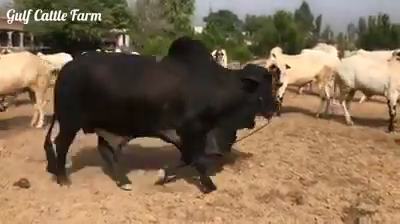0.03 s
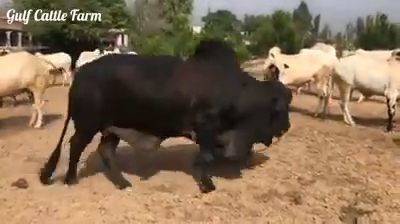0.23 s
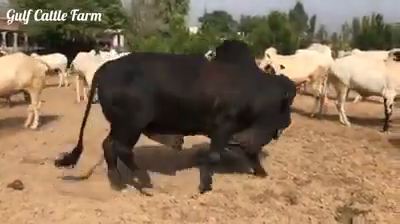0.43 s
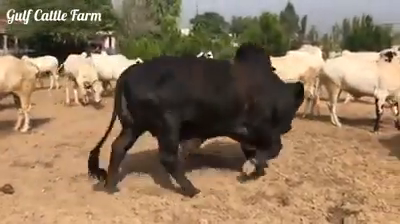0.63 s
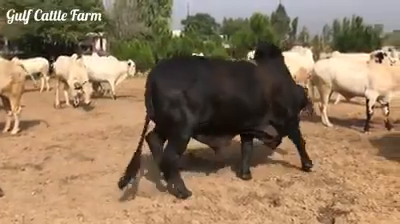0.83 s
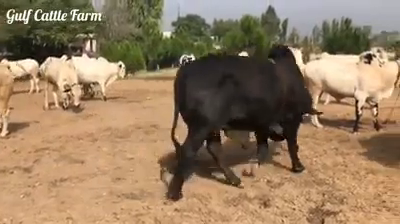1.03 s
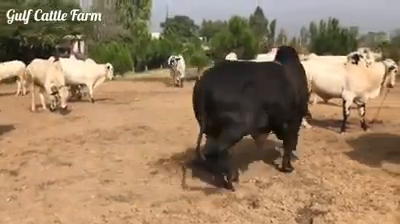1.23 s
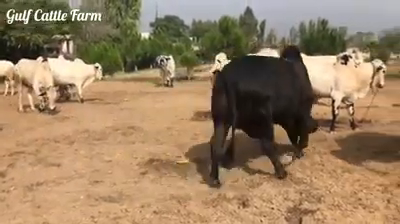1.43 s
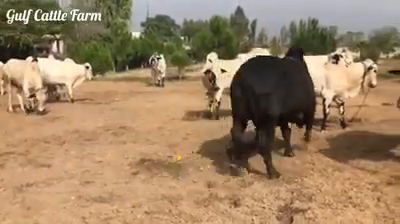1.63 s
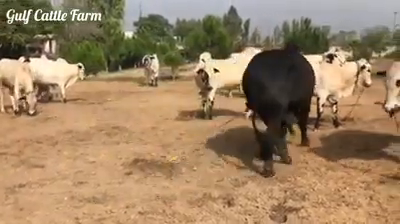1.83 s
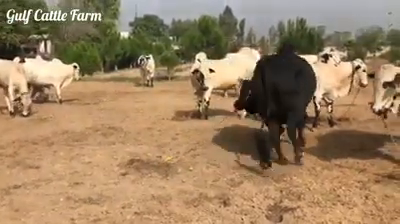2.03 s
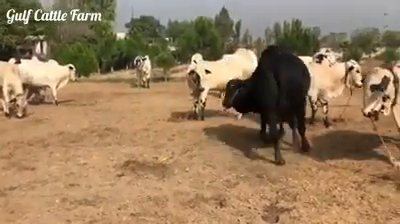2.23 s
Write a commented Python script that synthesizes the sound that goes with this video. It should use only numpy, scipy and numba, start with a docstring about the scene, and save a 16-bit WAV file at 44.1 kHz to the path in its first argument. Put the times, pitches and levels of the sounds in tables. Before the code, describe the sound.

A deep, raspy grunt from a nearby bull slows to a creak and finishes with a puff through the nostrils. Quiet gritty steps and a hoof knock follow, over faint outdoor rumble and a far idling engine.

```python
"""A farmyard of dry earth. A big bull gives one low, hoarse grunt: pulses from his vocal folds excite
the resonances of throat, chest and mouth, then slow into a creak. A snort of turbulent air through
the nostrils ends it. He walks off: hooves scuff, grit ticks and one hoof knocks twice. A far engine
idles over rumble and open-air hiss, and a small bird whistles faintly."""
import sys
import numpy as np
from scipy import signal
from scipy.fft import rfft, irfft
from scipy.io import wavfile
from scipy.ndimage import uniform_filter1d
from numba import njit

SR = 44100
rng = np.random.default_rng(int(sys.argv[2]) if len(sys.argv) > 2 else 0)


def put_to_file(sound):
    """Save the sound as 16-bit audio at rate SR, in the file named by the first command-line argument."""
    columns = np.atleast_2d(sound).T  # one column per channel
    safe = np.clip(columns, -1, 1)
    whole_steps = np.round(safe * 32767)
    wavfile.write(sys.argv[1], SR, whole_steps.astype(np.int16))


N = 105840
TIME_S, FREQ_HZ = np.arange(N) / SR, np.fft.rfftfreq(N, 1 / SR)


def undb(db):
    """Decibels to amplitude ratio."""
    return 10 ** (np.asarray(db) / 20)


def unit(x):
    """Normalisation to rms 1."""
    return x / np.sqrt(np.mean(x ** 2) + 1e-20)


def curve(rows, column=1):
    """Linear interpolation of a table column in time; the end values hold."""
    rows = np.array(rows)
    return np.interp(TIME_S, rows[:, 0], rows[:, column])


def drift(rate_hz):
    """Smoothed random steps, rms 1."""
    hold = max(int(SR / rate_hz), 1)
    steps = rng.standard_normal(N)[np.arange(N) // hold]
    return unit(uniform_filter1d(uniform_filter1d(steps, hold), hold))


def colour(x, points):
    """Minimum-phase filter through (frequency_hz, gain_db) points, by folding the cepstrum."""
    hz, db = np.array(points).T
    gain = undb(np.interp(np.log(np.maximum(FREQ_HZ, 1)), np.log(hz), db))
    cepstrum = irfft(np.log(gain), N)
    cepstrum[1:N // 2] *= 2
    cepstrum[N // 2 + 1:] = 0
    return irfft(rfft(x) * np.exp(rfft(cepstrum)), N)


@njit
def state_variable_filter(x, hz, width_hz):
    """Two integrators in a loop: a damped oscillator with a moving centre frequency."""
    y, band, low = np.empty(len(x)), 0., 0.
    for i in range(len(x)):
        g, damping = np.tan(np.pi * hz[i] / SR), width_hz / hz[i]
        v = (band + g * (x[i] + 1e-18 - low)) / (1 + g * (g + damping))
        band, low, y[i] = 2 * v - band, low + 2 * g * v, damping * v
    return y


def resonate(x, hz, width_hz):
    """Two equal resonators in cascade, each width_hz wide, with gain 1 at the centre."""
    for _ in range(2):
        x = state_variable_filter(x, hz * np.ones(N), float(width_hz))
    return x


def steep(x, hz, kind):
    """Sixth-order Butterworth high-pass or low-pass."""
    return signal.sosfilt(signal.butter(6, hz, kind, fs=SR, output="sos"), x)


# Partials of the idling engine: frequency_hz, level_db
ENGINE_PARTIALS = [(68.5, -51.5), (101.5, -53), (147, -63), (203, -63), (302, -71.5), (404, -69.5)]
# Swell of the whole drone: time_s, gain_db
ENGINE_SWELL = [(0, -3.5), (.9, -4), (1.5, 2.5), (2, -5), (2.4, -8)]
def engine(wander=0.00809, throb_db=1.5):
    """Rotating machinery: all partials follow one wandering speed, and each throbs on its own."""
    phase_per_hz = 2 * np.pi * np.cumsum(1 + wander * drift(5.92)) / SR
    drone = 0
    for hz, db in ENGINE_PARTIALS:
        amplitude = np.sqrt(2) * undb(db + throb_db * drift(14))
        drone += amplitude * np.sin(hz * phase_per_hz + 2 * np.pi * rng.random())
    return drone * undb(curve(ENGINE_SWELL))


# Spectrum of far rumble and hiss: frequency_hz, relative_db
AMBIENT_SPECTRUM = [(15, -31), (25, 0.5), (81, -3), (213, -14.5), (250, -31.5), (318, -13), (462, -28.5),
                    (673, -28.5), (2020, -27), (2240, -26.5), (3830, -29), (5010, -38.5), (13800, -41.5),
                    (15000, -37)]
def open_air(level_db=-51.5):
    """Ambient noise: a continuous spectrum, strongest in the bass, whose level wavers slowly."""
    return unit(colour(rng.standard_normal(N), AMBIENT_SPECTRUM)) * undb(level_db + 1.15 * drift(3))


# Vibration of the vocal folds: time_s, pitch_hz
FOLD_PITCH = [(.17, 101.2), (.24, 99.8), (.305, 101.3), (.365, 88.25), (.44, 86.5), (.5, 71.67),
              (.55, 59.3), (.6, 54.07)]
# Effort of the voice: time_s, boom_gain_db, odd_over_even_pulse_db
VOICE_EFFORT = [(0, -57, 4), (.11, -86.5, 7), (.155, -40, 1), (.2, -43, -4.5), (.22, -24.5, -2.5),
                (.25, -22, 0.5), (.32, -21, -7.5), (.39, -22, -6.5), (.445, -26, -5), (.47, -33, -6),
                (.5, -30.5, 3.5), (.557, -34.5, -10), (.573, -35, -15.5), (.605, -36, -5), (.66, -88, 2)]
def grunt(jitter=0.01015, shimmer_db=2.5, puff_decay_cycles=0.56):
    """Source and filter: alternating strong and weak glottal pulses drive the throat and mouth."""
    hz = curve(FOLD_PITCH) * (1 + jitter * drift(90))
    cycles = np.cumsum(hz) / SR
    pulse_index = cycles.astype(int)
    alternation_db = curve(VOICE_EFFORT, column=2) * (pulse_index % 2 - .5)
    strength = undb(shimmer_db * rng.standard_normal(N)[pulse_index] + alternation_db)
    pulses = unit(np.diff(pulse_index, prepend=0) * strength / np.sqrt(hz))
    # A turbulent puff follows each pulse.
    puffs = unit(np.exp(-(cycles % 1) / puff_decay_cycles) * rng.standard_normal(N))
    boom = throat_boom(pulses + 0.33 * puffs, cycles)
    return boom * undb(curve(VOICE_EFFORT)) + mouth_rasp(pulses + puffs)


# Response of the throat: frequency_hz, relative_db
THROAT_RESPONSE = [(30, -31), (60, -4), (100, -32), (135, -1), (175, 5.5), (220, -7), (295, 2), (335, -6),
                   (400, -7), (445, -29), (700, -21)]
# Upper edge of that response, falling as the throat slackens: time_s, cutoff_hz
THROAT_CUTOFF = [(.3, 440), (.42, 320), (.55, 269)]
def throat_boom(source, cycles, chest_hz=230, chest_width_hz=9.2, chest_db=7, fundamental_db=-7):
    """Forced resonance: the throat filters the pulses and the chest rings above their fundamental."""
    spectrum = rfft(colour(source, THROAT_RESPONSE))
    times, cutoffs = np.array(THROAT_CUTOFF).T
    throat = 0
    for share, hz in zip(np.eye(len(times)), cutoffs):  # crossfade from one low-pass to the next
        low_pass = 1 / np.sqrt(1 + (FREQ_HZ / hz) ** 16)
        throat += np.interp(TIME_S, times, share) * irfft(spectrum * low_pass, N)
    chest = state_variable_filter(throat, chest_hz * np.ones(N), chest_width_hz)
    fundamental = np.sqrt(2) * np.cos(2 * np.pi * cycles)
    return unit(unit(throat) + undb(chest_db) * unit(chest)) + undb(fundamental_db) * fundamental


# Resonances of the mouth: start_hz, end_hz, nominal_width_hz, start_gain_db, end_gain_db
FORMANTS = [(662, 734, 47, 7, 4), (881, 1095, 64, -0.5, 3), (1350, 1103, 112, -4, -27),
            (1485, 1825, 88, -10.5, -11.5), (1713, 1900, 48, -9, -16.5), (2880, 1900, 120, -28, -30),
            (3580, 5200, 104, -21, -60), (6430, 8200, 1460, -36.5, -33)]
# Envelope of the rasp: time_s, level_db
RASP_ENVELOPE = [(0, -72), (.13, -55.5), (.17, -49.5), (.192, -37), (.213, -30), (.245, -28.5), (.275, -33),
                 (.312, -30), (.36, -38.5), (.39, -34.5), (.415, -43), (.48, -39), (.54, -39.5),
                 (.556, -50), (.573, -41.5), (.64, -50), (.76, -69)]
def mouth_rasp(source, start_s=0.27, end_s=0.57, low_cut_hz=518):
    """Formant filtering: parallel resonances glide as the mouth changes shape."""
    move = np.interp(TIME_S, (start_s, end_s), (0, 1))
    rasp = 0
    for start_hz, end_hz, width_hz, start_db, end_db in FORMANTS:
        hz = start_hz + (end_hz - start_hz) * move
        gain = undb(start_db + (end_db - start_db) * move)
        rasp += gain * resonate(source, hz, 2 * width_hz)
    return unit(scatter(steep(rasp, low_cut_hz, "high"))) * undb(curve(RASP_ENVELOPE))


def scatter(x, lags_s=(0.0012, 0.0019, 0.0031), feedback=0.59):
    """All-pass diffusion: short reflections smear the pulses without colouring them."""
    spectrum = rfft(x)
    for lag_s in lags_s:
        delay = np.exp(-2j * np.pi * FREQ_HZ * lag_s)
        spectrum *= (delay - feedback) / (1 - feedback * delay)
    return irfft(spectrum, N)


# Soft hum before and after the grunt: time_s, pitch_hz, level_db
HUM_CONTOUR = [(0, 120, -46.5), (.055, 125.3, -45.5), (.09, 122, -54), (.6, 128.6, -58), (.64, 131, -42.5),
               (.7, 122.4, -43), (.745, 96, -43), (.79, 90.8, -69)]
def hum(jitter=0.01284):
    """Voicing with the mouth closed: a harmonic series of three partials."""
    phase = 2 * np.pi * np.cumsum(curve(HUM_CONTOUR) * (1 + jitter * drift(60))) / SR
    tone = np.sin(phase) + undb(-16) * np.sin(2 * phase) + undb(-9) * np.sin(3 * phase)
    return unit(tone) * undb(curve(HUM_CONTOUR, column=2))


# Spectrum of scuffed earth: frequency_hz, relative_db
EARTH_SPECTRUM = [(200, -3), (600, 7), (1500, 2.5), (3800, -0.5), (5000, -10.5), (15000, -16.5)]
# Soles dragging on dry earth: centre_s, half_length_s, level_db, tilt_db_per_octave
HOOF_SCUFFS = [(0.079, 0.0082, -45.5, -2.5), (0.881, 0.035, -56, 12.5), (0.987, 0.039, -54.5, 8),
               (1.049, 0.033, -57.5, 5), (1.12, 0.022, -52.5, 6.5), (1.22, 0.049, -55, 3.5),
               (1.344, 0.054, -52.5, 5), (1.437, 0.045, -52, 5), (1.511, 0.18, -56, 2.5),
               (1.795, 0.0095, -51.5, 4), (1.847, 0.21, -63.5, 1.5), (2.134, 0.14, -54, 0)]
def hoof_scuffs(grain_spread_db=6):
    """Friction noise: fine grains of uneven strength swell and fade under a Gaussian envelope."""
    out = 0
    for centre_s, half_length_s, db, tilt in HOOF_SCUFFS:
        grains = rng.standard_normal(N)
        grains *= undb(grain_spread_db * np.minimum(rng.exponential(size=N), np.pi))
        tilted = [(hz, earth_db + tilt * np.log2(hz)) for hz, earth_db in EARTH_SPECTRUM]
        swell = np.exp(-((TIME_S - centre_s) / half_length_s) ** 2)
        out += undb(db) * swell * unit(colour(grains, tilted))
    return out


# Notes of a far bird: start_s, length_s, start_hz, end_hz, level_db
BIRD_NOTES = [(.1, .075, 4250, 3650, -65), (1.69, .05, 3900, 4100, -69)]
def bird(jitter=0.029):
    """Frequency modulation: each thin whistle is one sinusoid that glides and trembles."""
    out = 0
    for start_s, length_s, start_hz, end_hz, db in BIRD_NOTES:
        progress = np.clip((TIME_S - start_s) / length_s, 0, 1)
        hz = (start_hz + (end_hz - start_hz) * progress) * (1 + jitter * drift(400))
        envelope = np.sqrt(2 * np.abs(np.sin(np.pi * progress)))
        out += undb(db) * envelope * np.sin(2 * np.pi * np.cumsum(hz) / SR)
    return out


# Response of the nostrils: frequency_hz, relative_db
NOSTRIL_RESPONSE = [(40, -22), (130, 1.5), (235, 8), (300, 3.5), (375, -23), (425, -40), (480, -7.5),
                    (600, 3.5), (1400, 2), (2000, -4.5), (3300, -9), (4500, -13.5), (7000, -20),
                    (10000, -21), (15000, -24.5)]
# Rush of air through them: time_s, level_db
AIR_ENVELOPE = [(.15, -57.5), (.23, -51), (.4, -44), (.55, -50), (.59, -43.5), (.63, -38), (.67, -43),
                (.73, -46), (.79, -62.5)]
# The chest ringing on as the voice lets go: time_s, level_db
CHEST_RING = [(.54, -65), (.573, -29.5), (.6, -39.5), (.645, -36.5), (.67, -44), (.72, -48.5), (.76, -69)]
def snort(chest_hz=237.8, flutter_db=1.2, jitter=0.0139):
    """Turbulence in a duct: air rushes through the nostrils while the chest rings with a low tone."""
    air = unit(colour(rng.standard_normal(N), NOSTRIL_RESPONSE))
    air *= undb(curve(AIR_ENVELOPE) + flutter_db * drift(70))
    chest_phase = 2 * np.pi * np.cumsum(chest_hz * (1 + jitter * drift(80))) / SR
    return air + unit(np.sin(chest_phase)) * undb(curve(CHEST_RING))


# Grit and clods cracking: start_s, peak_db, centre_hz, nominal_width_hz, decay_s
GRIT_TICKS = [(0.8727, -38, 10900, 5000, 0.0053), (.877, -39, 10000, 6000, 0.0032),
              (.989, -38, 9800, 6980, 0.0054), (0.989, -39.5, 3770, 250, 0.00092),
              (1.3106, -37, 11700, 5954, 0.0049), (1.363, -39, 2600, 2500, 0.0032),
              (1.786, -39, 6560, 12000, 0.0035)]
def grit_ticks():
    """Brittle fracture: each crack is a band of noise that decays exponentially."""
    out = 0
    for start_s, db, hz, width_hz, decay_s in GRIT_TICKS:
        envelope = (TIME_S >= start_s) * np.exp(-np.abs(TIME_S - start_s) / decay_s)
        crack = resonate(rng.standard_normal(N) * envelope, hz, 2 * width_hz)
        out += undb(db) * crack / np.abs(crack).max()
    return out


# A hoof striking hard ground twice: start_s, peak_db, centre_hz, width_hz
HOOF_KNOCKS = [(1.3632, -27.5, 1870, 2930), (1.37, -27.5, 1120, 3100)]
def hoof_knocks(top_hz=3400):
    """Impulse response: each impact excites a broad, heavily damped resonance."""
    out = 0
    for start_s, db, hz, width_hz in HOOF_KNOCKS:
        impulse = signal.unit_impulse(N, int(start_s * SR))
        knock = steep(resonate(impulse, hz, width_hz), top_hz, "low")
        out += undb(db) * knock / np.abs(knock).max()
    return out


def scene():
    """Superposition: the bull, his steps and the farm around him add in one channel."""
    bull = grunt() + snort() + hum()
    steps = hoof_scuffs() + grit_ticks() + hoof_knocks()
    return (bull + steps + bird() + engine() + open_air())[None]


def record(dry):
    """Band limiting: filters remove the deepest bass and the highest treble."""
    low_cut_hz, top_hz = 29, 14950
    dry = signal.sosfilt(signal.butter(4, low_cut_hz, "high", fs=SR, output="sos"), dry)
    return signal.sosfilt(signal.ellip(10, .2, 70, top_hz, fs=SR, output="sos"), dry)


dry = scene()
out = record(dry)
put_to_file(out)
```